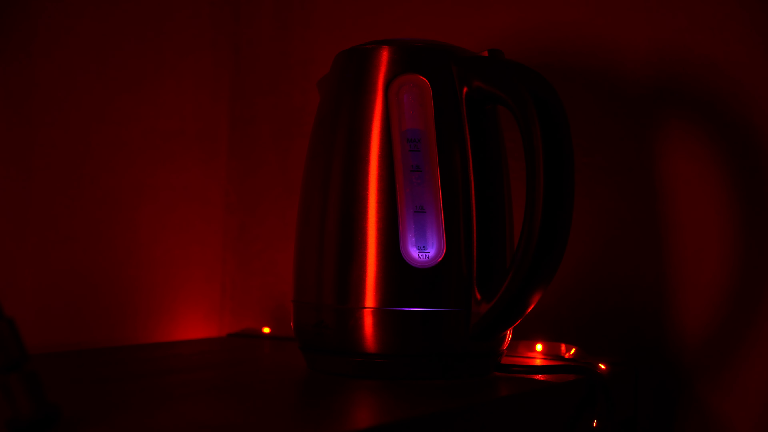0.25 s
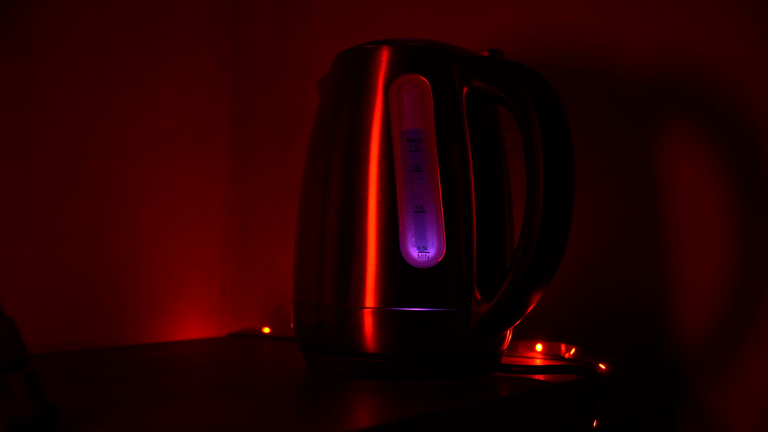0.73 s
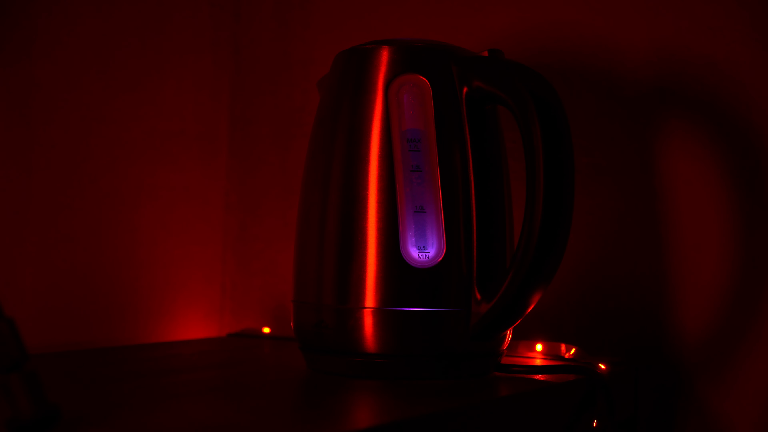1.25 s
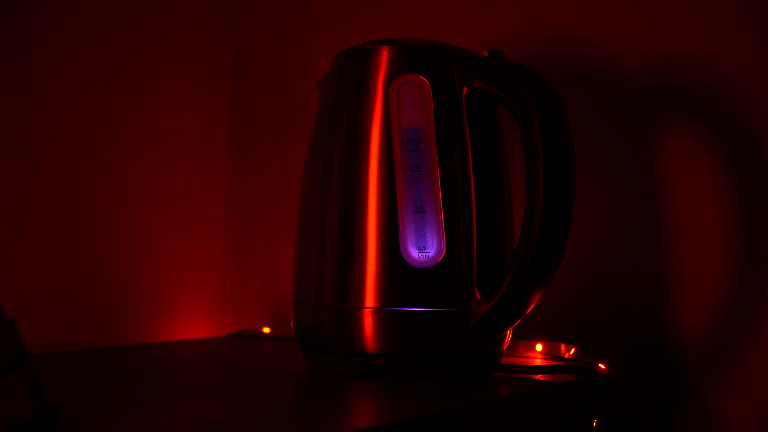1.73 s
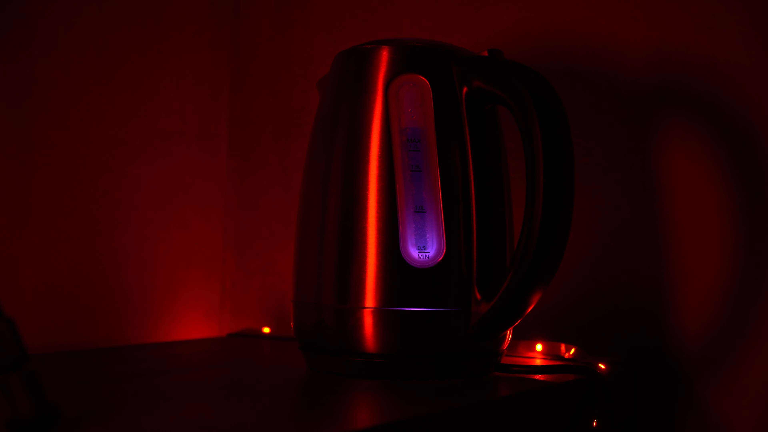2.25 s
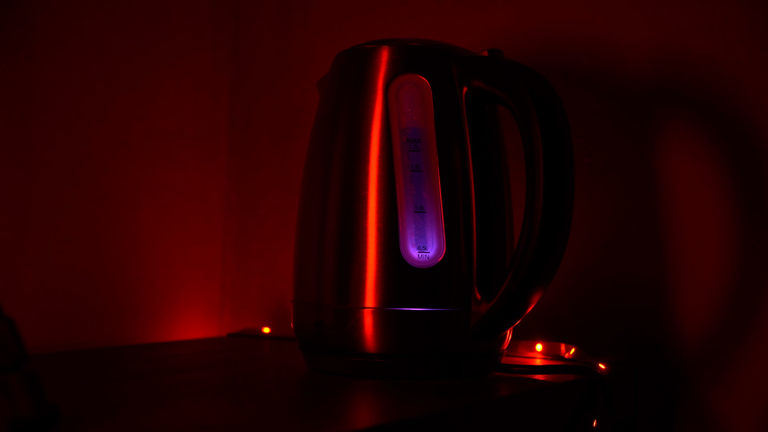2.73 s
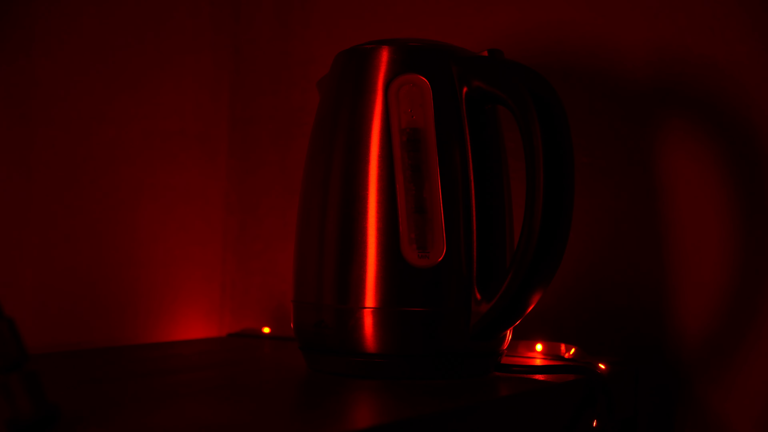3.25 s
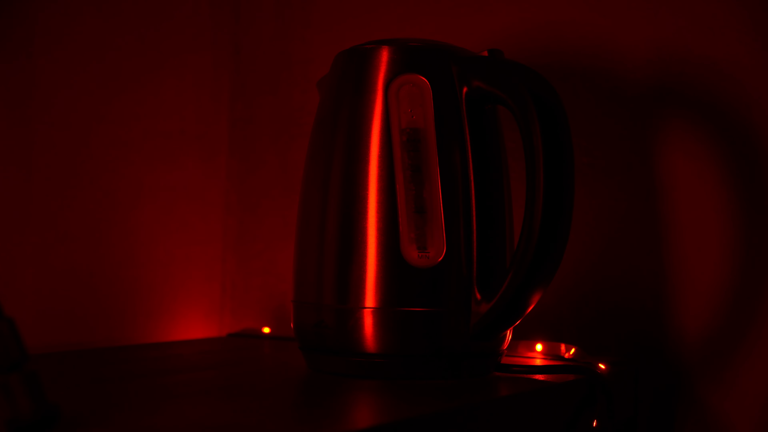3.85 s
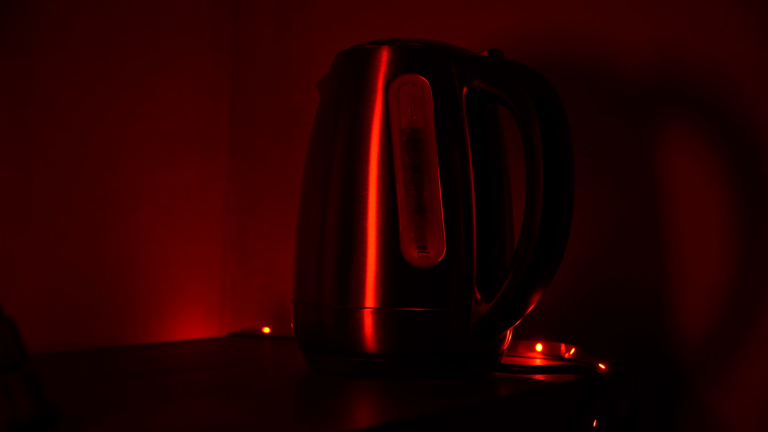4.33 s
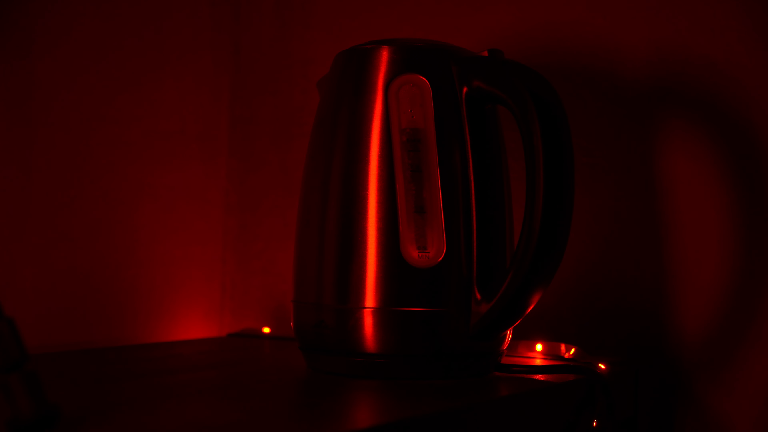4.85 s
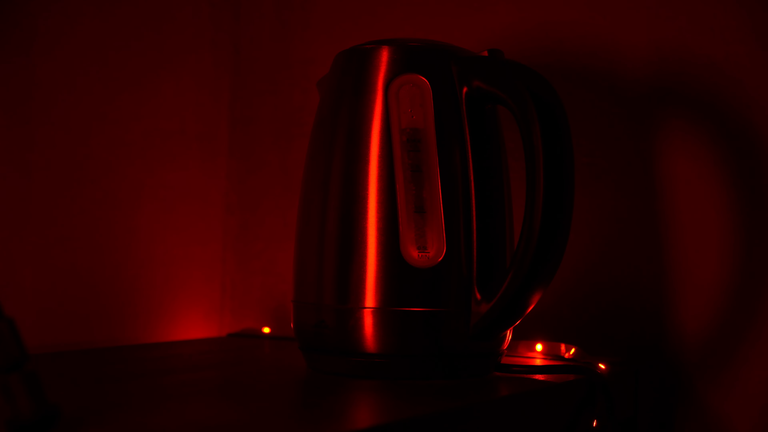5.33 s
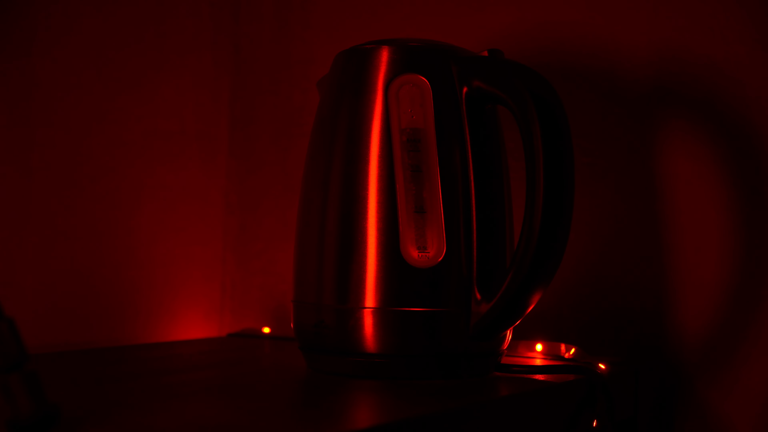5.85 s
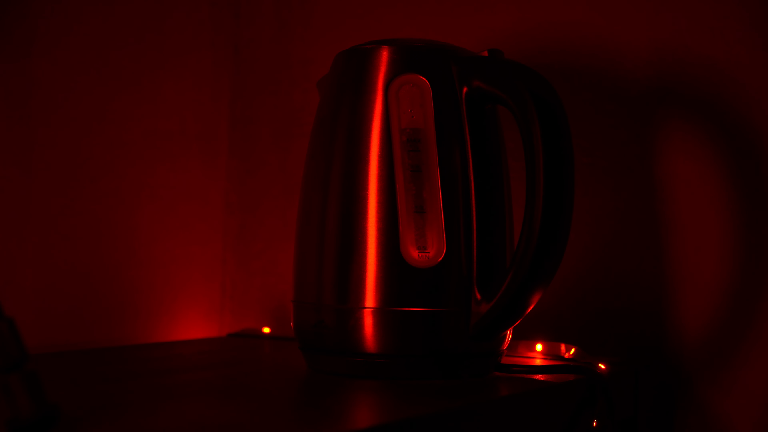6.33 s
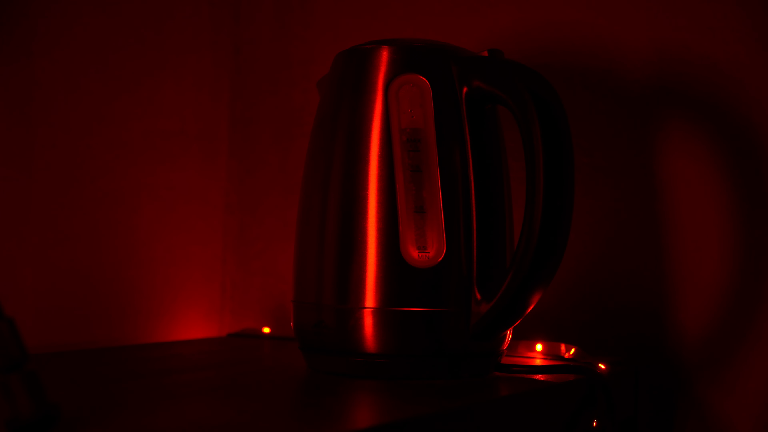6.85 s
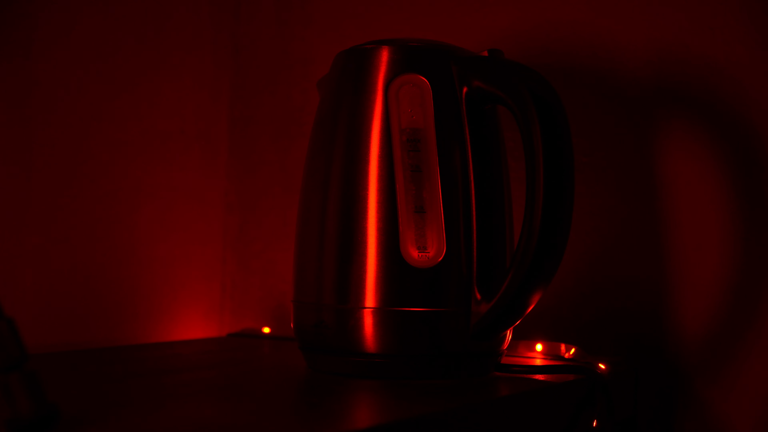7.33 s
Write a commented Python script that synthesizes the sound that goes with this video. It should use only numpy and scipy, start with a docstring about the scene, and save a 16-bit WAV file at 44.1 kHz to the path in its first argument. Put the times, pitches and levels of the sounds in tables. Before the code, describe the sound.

Continuous kettle noise, already under way: a muffled, metallic-shelled rumble of water with fine irregular bubbling flutter and faint fizz on top. A very brief gap interrupts it early, after which the tone is darker and deeper. Later the hollow drone sinks gently while the watery rush continues, until a last momentary dropout at the end. Small quiet room, close single-channel pickup.

```python
"""A steady rush is heard first: an electric kettle close to the boil in a quiet room.
Steam bubbles collapse in the water as random clicks, which ring the shell and the air above the water.
The sound dips to silence for an instant, twice, the second time at the very end.
After the first dip the boom is deeper and the drone slowly fades.
Six layers share the spectrum, and a short room tail smears the treble."""
import sys
import numpy as np
from scipy import signal
from scipy.fft import rfft, irfft
from scipy.io import wavfile

SR = 44100
rng = np.random.default_rng(int(sys.argv[2]) if len(sys.argv) > 2 else 0)


def undo_db(level):
    """Turn decibels back into plain size, where 20 dB means ten times bigger."""
    steps = np.asarray(level, float) / 20
    return 10 ** steps


def wrap_up_sound(samples):
    """Save the sound to the file named by the first command line argument, as 16-bit audio."""
    columns = np.atleast_2d(samples).T
    # keep every value between -1 and 1, then stretch to whole-number steps
    tamed = np.clip(columns, -1, 1)
    steps = np.round(tamed * 32767).astype(np.int16)
    wavfile.write(sys.argv[1], SR, steps)


N = 335148  # samples
RING = 8192  # length of the kettle and room responses, samples


def evened(x):
    """Normalisation: the mean power becomes 1."""
    return x / np.sqrt(np.mean(x ** 2) + 1e-20)


def room(x):
    """Diffuse reverberation: many small reflections from counter and walls smear and ripple the treble."""
    level_db, t60_s, highpass_hz = -14, 0.1, 1800
    t = np.arange(RING) / SR
    tail = rng.standard_normal(RING) * undo_db(-60 * t / t60_s)
    tail = undo_db(level_db) * tail / np.linalg.norm(tail)
    highpass = signal.butter(4, highpass_hz, "highpass", fs=SR, output="sos")
    treble = signal.sosfilt(highpass, x)
    return x + signal.oaconvolve(treble, tail)[:N]


def bubble_bursts():
    """Amplitude modulation by slow chance: bubbles come in bursts of some tens of milliseconds."""
    band = signal.butter(1, [5, 30], "bandpass", fs=SR, output="sos")  # Hz
    return evened(signal.sosfiltfilt(band, rng.standard_normal(N + RING - 1)))


def bubble_pops():
    """Impulsive excitation: each collapsing bubble gives a click of random size and sign."""
    pops_per_s = 25000
    count = N + RING - 1  # the pops start almost one ring length early
    size = rng.standard_normal(count)
    return size * (rng.random(count) < pops_per_s / SR)


# Broad colour of the pops heard in the room:
# (frequency [Hz], early level [dB], middle level [dB], late level [dB])
BROAD_COLOUR = [(20, -35, -23, -15), (49.4, -12, -13.7, -11), (86, -17, -19, -13.5),
                (125, -11.5, -5.5, -4.5), (305.5, -8.5, -3.5, -3), (650, -19.5, -20.5, -18),
                (1130, -20, -22, -19), (1472, -25, -24.5, -24.5), (2540, -35.5, -37.5, -36.5),
                (3980, -39, -39, -36), (5000, -44, -45, -43.5), (7200, -49, -50.0, -48.5),
                (9030, -44, -43, -41.5), (11700, -54, -54.5, -54), (15700, -60, -60, -58)]
# Resonances (positive) and dead spots (negative) of shell, water and air space:
# (centre [Hz], width at half the dB height [Hz], early height [dB], middle height [dB], late height [dB])
RESONANCES = [(118, 12, -2, -5, -5), (165, 33, 6.6, 8.2, 8.7), (171, 12, 0, 3, 3),
              (198, 30, 8.4, 0.7, -2.2), (217, 21, 1.8, -6.9, -7.1), (261, 33, 6.8, 1.0, -0.8),
              (296, 31, 4.2, -4.1, -1.8), (335, 88, 8.0, 3.2, -1.5), (412, 27, -0.1, -8.7, -9.7),
              (477, 124, 15.1, 13.2, 6.9), (503, 18, 6.6, 6.7, 2.5), (524, 57, -10.3, -11.5, -12.1),
              (605, 64, 13.0, 13.1, 9.5), (748, 61, 1.1, 4.0, 5.5), (888, 102, 1.7, 3.3, 3.2),
              (954, 29, 5.5, 6.2, 5.3), (1015, 30, 5, 0, 0), (1135, 72, -8.6, -5.1, -4.3),
              (1242, 45, 2.5, 2.5, 5.5), (1342, 37, 2.7, 4.0, 5.5), (1394, 47, 5.1, 6.5, 8.2),
              (1404, 16, 2, 3, 3), (1426, 29, -5.0, -6.5, -6.3), (1616, 220, -4.9, -5.7, -6.3),
              (2168, 76, 2.9, 4.1, 4.3), (2994, 312, 2.3, 5.0, 4.0), (3534, 186, 0.5, 4.3, 5.5),
              (4651, 366, -2.1, -2.4, -1.2), (8189, 640, 1.0, 3.6, 3.6), (9136, 190, -2.0, -4.5, -2.9),
              (9881, 363, 4.0, 3.7, 3.3), (13018, 414, 1.8, 1.6, 1.9)]


def kettle_db(hz, stage):
    """Resonance: modes of the kettle raise peaks and sink dead spots in the broad colour."""
    table_hz, *levels_db = np.transpose(BROAD_COLOUR)
    colour = np.interp(np.log(hz + 1), np.log(table_hz), levels_db[stage])
    for centre, width, *height_db in RESONANCES:
        bell = np.exp(-4 * np.log(2) * ((hz - centre) / width) ** 2)
        colour += height_db[stage] * bell
    return colour


def minimum_phase_ring(gain_db):
    """Causality: folding the cepstrum of a gain curve gives its minimum-phase impulse response."""
    cepstrum = irfft(gain_db * np.log(10) / 20)
    half = len(cepstrum) // 2
    cepstrum[1:half] *= 2
    cepstrum[half + 1:] = 0
    return irfft(np.exp(rfft(cepstrum)))[:half]


# Crossovers between rumble, boom, drone, rush, fizz and hiss: (frequency [Hz])
CROSSOVERS_HZ = [110, 215, 690, 1600, 6500]


def power_shares(hz):
    """Band division: steep crossovers split the power among the layers, and the shares add to 1."""
    above = [1 / (1 + (edge / (hz + 1)) ** 30) for edge in CROSSOVERS_HZ]
    return -np.diff([np.ones_like(hz), *above, np.zeros_like(hz)], axis=0)


# Strength of each layer, rumble to hiss: (level at the start [dB], slope up to the first dip [dB/s],
# level after the dip [dB], slope up to the turn [dB/s], turn [s], slope after the turn [dB/s])
LAYER_LEVELS = [(-58, -1.5, -55.5, 0.87, 4.9, -1.0), (-42.6, 0.1, -41.5, 0.68, 4.8, -1.64),
                (-35, -0.7, -37, -0.23, 3.56, -1.42), (-47, -1.4, -52, 1.25, 4.74, -0.3),
                (-56.5, -1, -61, 1.29, 4.76, -0.5), (-69, -0.5, -70.5, 1.13, 4.7, -0.16)]
# Further slope of each layer, rumble to hiss, late in the scene: (slope [dB/s])
LATE_SLOPES = [-0.1, -0.29, 0.17, -0.85, -0.16, -0.1]


def layer_level_db(t, layer):
    """Sound level in time: slopes linear in decibels, with a step at the first dip."""
    late_s = 5.7  # the late slope adds in from here
    start_db, first_slope, step_db, next_slope, turn_s, last_slope = LAYER_LEVELS[layer]
    before = start_db + first_slope * t
    after = step_db + next_slope * (np.minimum(t, turn_s) - DIPS_S[0])
    after = after + last_slope * np.maximum(t - turn_s, 0)
    after = after + LATE_SLOPES[layer] * np.maximum(t - late_s, 0)
    return np.where(t < DIPS_S[0], before, after)


# Clumping of the pops in each layer, rumble to hiss: (level swing per unit of the burst signal [dB])
CLUMPING_DB = [.2, .2, 0.64, 0.88, 0.71, 0.61]


def boil():
    """Source and filter: in each layer clumped pops ring that layer's share of the kettle."""
    settle_s = (3.5, 4.95)  # the middle colour turns into the late one as the water settles
    hz, t = np.fft.rfftfreq(2 * RING, 1 / SR), np.arange(N) / SR
    early, late = t < DIPS_S[0], np.interp(t, settle_s, [0, 1])
    stage_weights = [early, (1 - late) * ~early, late]
    colours = [kettle_db(hz, stage) for stage in range(3)]
    burst, out = bubble_bursts(), np.zeros(N)
    for layer, share in enumerate(power_shares(hz)):
        clumped = evened(bubble_pops() * undo_db(CLUMPING_DB[layer] * burst))
        ringing = np.zeros(N)
        for weight, colour in zip(stage_weights, colours):
            ring = minimum_phase_ring(colour + 10 * np.log10(share + 1e-9))
            ring = ring / np.linalg.norm(ring)
            ringing += weight * signal.oaconvolve(clumped, ring, "valid")
        out += ringing * undo_db(layer_level_db(t, layer))
    return out


# Instants at which the sound dips to silence: (time [s])
DIPS_S = [1.412, 7.591]


def level_dips(x):
    """Amplitude envelope: the level falls to zero and rises again at each dip."""
    fall_s, rise_s = 0.0058, 0.0065
    t = np.arange(N) / SR
    for dip in DIPS_S:
        x = x * np.interp(t, [dip - fall_s, dip, dip + rise_s], [1, 0, 1])
    return x


def scene():
    """Superposition: the boiling kettle and its room reflections, with the dips, on one channel."""
    return level_dips(room(boil()))[None]


def top_cut(x):
    """Nothing passes above the cut-off."""
    return signal.sosfilt(signal.butter(12, 15640, fs=SR, output="sos"), x)


def record(dry):
    """Signal chain: the finished mix passes to the output with no further change of level."""
    return top_cut(dry)


dry = scene()
out = record(dry)
wrap_up_sound(out)
```